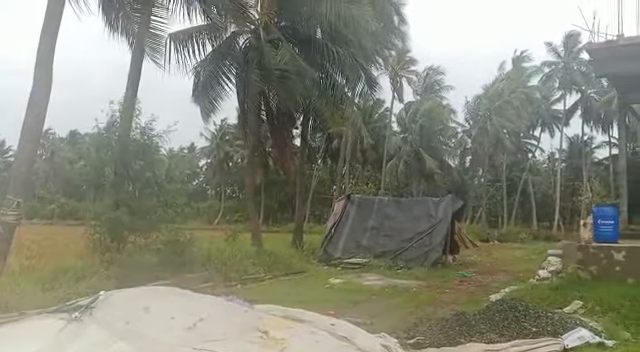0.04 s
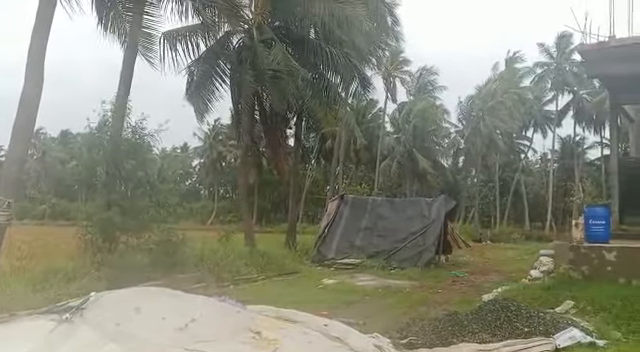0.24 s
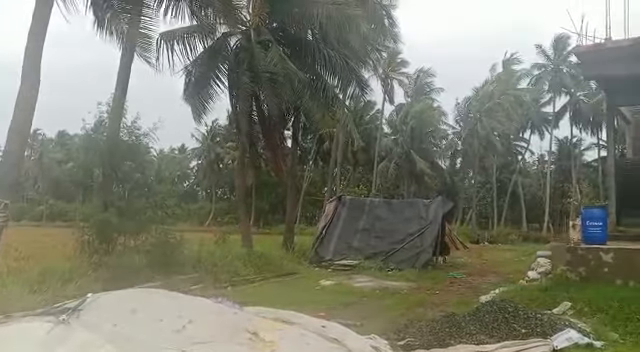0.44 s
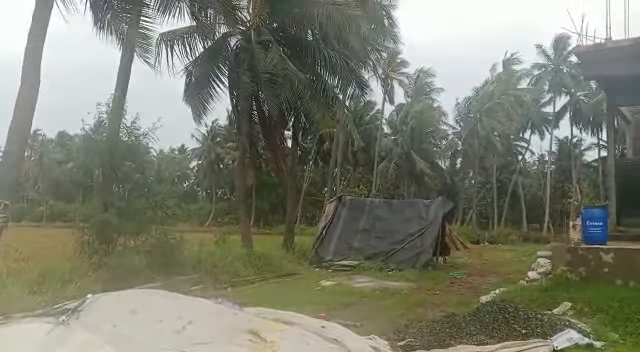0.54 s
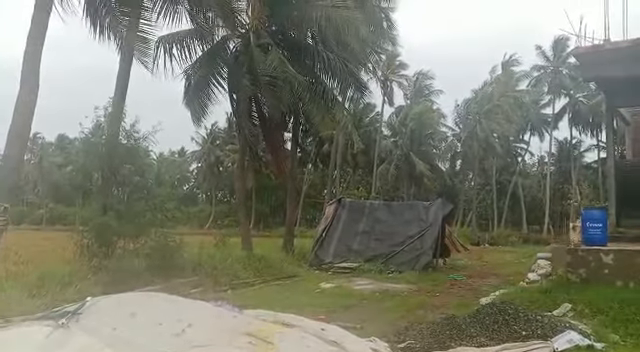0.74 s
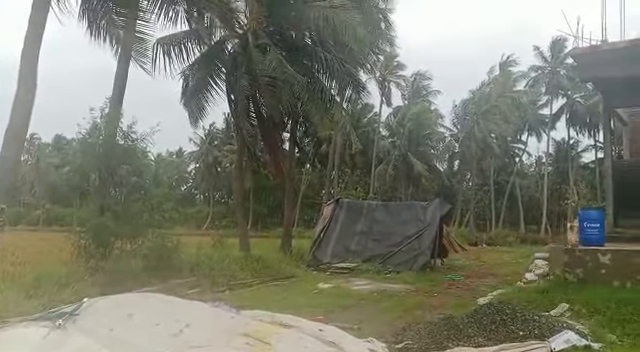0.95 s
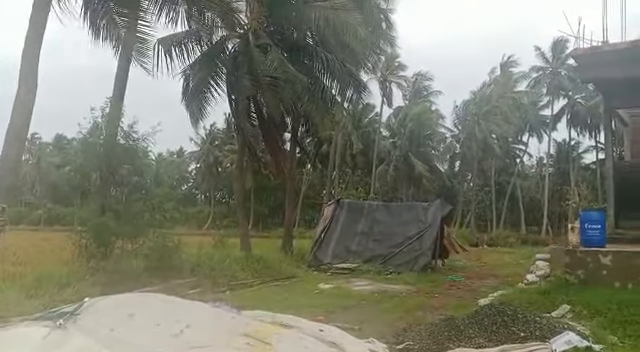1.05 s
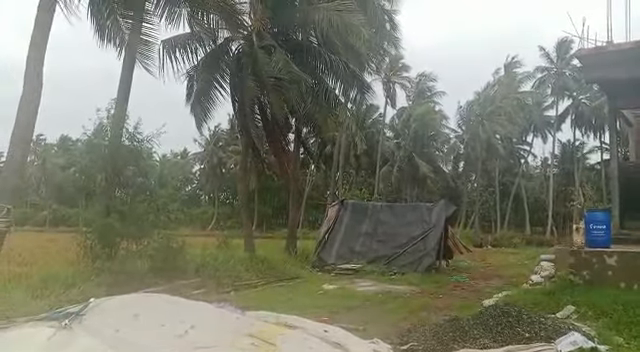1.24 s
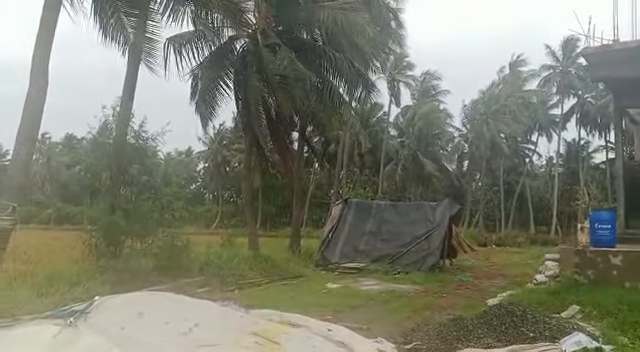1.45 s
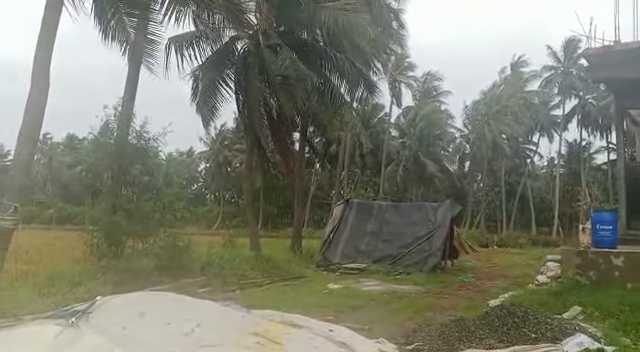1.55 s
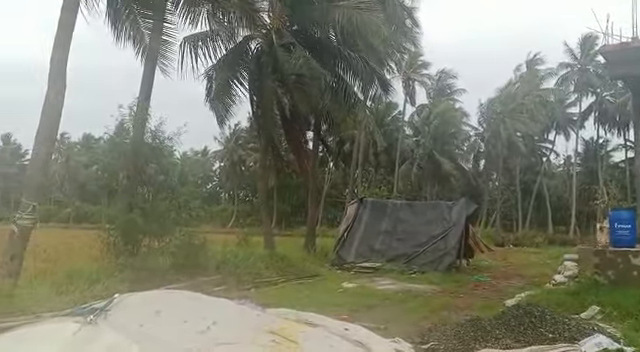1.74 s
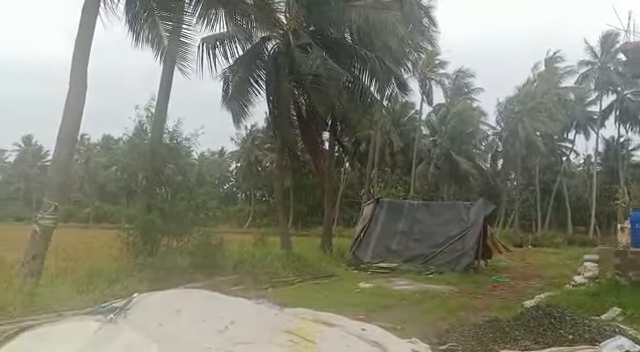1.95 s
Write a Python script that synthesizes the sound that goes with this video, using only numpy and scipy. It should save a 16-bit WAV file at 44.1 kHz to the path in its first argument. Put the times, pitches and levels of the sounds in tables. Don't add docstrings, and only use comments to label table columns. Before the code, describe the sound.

Strong wind hits a bare microphone in an open field: a burst of thumps, lighter broken flutter with brief lulls, then a dense roaring gust. Very faint palm rustle and insect hiss sit far behind.

```python
import sys
import numpy as np
from scipy import signal
from scipy.fft import rfft, irfft, next_fast_len
from scipy.io import wavfile
from scipy.ndimage import uniform_filter1d, minimum_filter1d, map_coordinates

SR = 44100
rng = np.random.default_rng(int(sys.argv[2]) if len(sys.argv) > 2 else 0)


def to_wav(sig):
    pcm = np.clip(np.atleast_2d(sig), -1, 1) * 32767
    pcm = np.round(pcm).astype(np.int16)
    wavfile.write(sys.argv[1], SR, pcm.T)


def gain_from_db(level_db):
    decades = np.asarray(level_db, float) / 20
    return 10 ** decades


N = 88596
TIME_S = np.arange(N) / SR


def unit(x):
    return x / np.sqrt(np.mean(x ** 2) + 1e-20)


def curves(rows):
    s, *cols = np.transpose(rows)
    return [np.interp(TIME_S, s, c) for c in cols]


def wobble(rate_hz):
    knots = rng.standard_normal(int(N * rate_hz / SR) + 4)
    return map_coordinates(knots, [np.arange(N) * rate_hz / SR])


def bump(s, half_s):
    return np.exp(-((TIME_S - s) / half_s) ** 2)


def filtered(x, response):
    m = next_fast_len(N + SR // 2)
    return irfft(rfft(x, m) * response(np.fft.rfftfreq(m, 1 / SR)), m)[..., :N]


def rush(spectrum, patchy_db):
    z = signal.stft(rng.standard_normal(N + 512), nperseg=512)[2]
    patches = uniform_filter1d(rng.standard_normal(z.shape), size=4, axis=0)
    patches = uniform_filter1d(patches, size=8, axis=1)
    x = signal.istft(z * gain_from_db(patchy_db * unit(patches)), nperseg=512)[1][:N]
    f, db = np.transpose(spectrum)

    def colour(hz):
        return gain_from_db(np.interp(np.log(hz + 1), np.log(f + 1), db, left=-120, right=-120))

    return unit(filtered(x, colour))


def narrow(hz, wide_hz):
    return unit(filtered(rng.standard_normal(N), lambda f: np.exp(-((f - hz) / wide_hz) ** 2)))


FINE_DB = 18.5


def eddies(s, top_hz, level_db, tilt_db, scatter_db, span, size=500):
    luck = rng.random(s.shape + (3,))
    octaves = span * luck[..., 0]
    scatter = 3.54 * (luck[..., 1] ** 2.94 - 0.6458)
    fine_loss_db = FINE_DB * np.clip(1 - octaves, 0, 1) ** 2
    gain_db = level_db - fine_loss_db - tilt_db * (octaves - span) + scatter_db * scatter
    hz = (top_hz * 2 ** -octaves).ravel()[:, None]
    gain = gain_from_db(gain_db).ravel()[:, None] * (s.ravel()[:, None] < N / SR)
    phase = luck[..., 2].ravel()[:, None]
    step = np.arange(-size, size)
    periods = step / SR * hz
    width_periods = 0.48
    swing = gain * np.exp(-(periods / width_periods) ** 2) * np.cos(2 * np.pi * (periods + phase))
    centre = np.clip(np.round(s.ravel() * SR).astype(int), 0, N - 1)
    at = centre[:, None] + step + size
    return np.bincount(at.ravel(), swing.ravel(), N + 2 * size)[size:N + size]


# [t/s, level/dB, sharpness/dB]
WIND = [(0, -16, -44.5), (.1, -25, -27.5), (.15, -30.5, -42.5), (.2, -26.5, -22.5), (.31, -36.5, -22.5),
        (.34, -27.5, -26.5), (.44, -31.5, -17.5), (.49, -29.5, -50), (.6, -26, -20.5), (.66, -37, -36.5),
        (.72, -26, -34.5), (.8, -26.5, -25), (.97, -22, -14), (1.36, -23.5, -15.5), (1.41, -26.5, -2.5),
        (1.57, -23, -27), (1.65, -24.5, -9), (2.0, -22.5, -10)]
# [f/Hz, density/dB]
RUMBLE = [(27, -48), (59, 1), (134, 6.5), (500, -15.5), (650, -14.5), (1100, -120)]


def stream(count=2400):
    strength_db, sharp_db = curves(WIND)
    top_hz = np.clip(1650 * gain_from_db(0.22 * sharp_db), 200, 4000)
    lumps = wobble(44.88)
    at = rng.integers(0, N, count)
    lump = lumps[at]
    swirl_hz = top_hz[at] * 2 ** (0.12 * lump)
    swirls = unit(eddies(at / SR, swirl_hz, lump, tilt_db=1.5, scatter_db=4, span=3.193))
    rumble = unit(gain_from_db(3.3 * wobble(25)) * rush(RUMBLE, patchy_db=0.5))
    return gain_from_db(strength_db) * (gain_from_db(0.1) * swirls + gain_from_db(-1.5) * rumble)


# [f/Hz, density/dB]
HISS = [(3000, -120), (4000, -4.5), (11500, 2), (13300, 3), (13700, -5.5), (16000, 5)]


def preamp_hiss():
    return gain_from_db(-78.5 - 4.2 * TIME_S) * rush(HISS, patchy_db=-1.0)


# [t/s, level/dB]
RUSTLE = [(0.03, -71.5), (0.364, -65), (0.446, -67.5), (0.522, -61), (0.578, -68), (0.628, -59),
          (0.72, -69), (1.226, -70), (2.0, -78.5)]
# [f/Hz, density/dB]
FRONDS = [(5000, -32.5), (6830, -6), (7890, -6), (8900, -10), (11600, -30)]
# [f/Hz, density/dB]
LEAVES = [(500, -120), (800, -6), (1250, 1.5), (1650, -20.5), (2100, -13.5), (2700, -27), (3300, -19),
          (4400, -37.5)]


def palm_fronds():
    rustle = gain_from_db(curves(RUSTLE)[0] - 4.5) * rush(FRONDS, patchy_db=4.3)
    wind_db = np.minimum(curves(WIND)[0], -24) + 29
    leaves_db = -58.5 - 1.8 * TIME_S + 0.18 * wind_db
    return rustle + gain_from_db(leaves_db) * rush(LEAVES, patchy_db=4)


# [t/s, level/dB]
CHORUS = [(0.03, -58.5), (0.588, -56.5), (1.296, -56.5), (1.784, -63), (2.0, -63)]
# [f/Hz, density/dB]
INSECTS = [(9000, -31.5), (9610, -1.5), (10000, 6.5), (10500, -1.5), (11900, -24.5), (15400, -60.5)]


def insect_chorus():
    level_db = curves(CHORUS)[0] + 0.43 * wobble(150) + 0.54 * wobble(10)
    return gain_from_db(level_db) * rush(INSECTS, patchy_db=-2.0)


# [t/s, peak level/dB, sharpness/dB, length/s]
FLUTTERS = [(0.02, -2, -16, 0.025), (0.036, -1, -6.5, 0.026), (0.076, -11, -12, 0.016),
            (0.092, -1.5, -23.5, 0.024), (0.114, -18.5, -22, 0.025), (0.189, -33, -34, 0.027),
            (0.197, -9.5, -39, 0.043), (0.256, -10, -39, 0.028), (0.335, -20, -44, 0.028),
            (0.376, -14.5, -28, 0.042), (0.413, -12.5, -23.5, 0.031), (0.434, -36, -2, 0.02),
            (0.529, -14, -28.5, 0.025), (0.551, -18, -38, 0.025), (0.603, -7.5, -24, 0.021),
            (0.704, -9, -31.5, 0.027), (0.726, -5.5, -23, 0.028), (0.754, -9.5, -29, 0.025),
            (0.835, -12, -29, 0.029), (0.875, -10, -29, 0.022), (0.914, -29.5, -27.5, 0.031),
            (0.934, -18, -26, 0.02), (0.957, -9, -39.5, 0.022), (0.974, -4.5, -15.5, 0.027)]
# [t/s, peak level/dB, sharpness/dB, length/s]
PUFFS = [(1.016, -9, -34, 0.028), (1.044, -3, -35, 0.021), (1.069, -12, -41, 0.013),
         (1.099, -1.5, -40.5, 0.018), (1.135, -10, -38.5, 0.021), (1.156, -15, -43, 0.03),
         (1.207, -8, -23.5, 0.026), (1.218, -8, -25.5, 0.018), (1.289, 0.5, -28, 0.023),
         (1.326, -2.5, -32, 0.022), (1.353, -3.5, -28.5, 0.026), (1.441, -6, -29.5, 0.028),
         (1.484, -2.5, -39, 0.036), (1.535, -7.5, -33, 0.026), (1.555, -8, -37, 0.03),
         (1.594, -6.5, -28, 0.018), (1.616, -5, -27, 0.013), (1.629, -8.5, -27, 0.012),
         (1.66, -4.5, -21, 0.018), (1.683, -6, -23.5, 0.022), (1.697, -1.5, -31, 0.027),
         (1.73, -1.5, -26, 0.032), (1.772, -3.5, -24.5, 0.021), (1.809, -4, -28, 0.028),
         (1.825, -5.5, -24, 0.023), (1.89, -7, -32, 0.03), (1.903, -5, -37.5, 0.024),
         (1.959, -12, -31.5, 0.02), (1.979, -8, -20, 0.021)]


def puffs(table, base_hz, law, count=64):
    s, db, sharp_db, length_s = np.transpose(table)[..., None]
    place = 2.7 * (np.arange(count) + rng.random((len(table), count))) / count - 1.25
    edge = np.abs(place) ** 0.85
    late = np.where(place < 0, .42, .62) * place + .3
    top_hz = np.clip(base_hz * gain_from_db(law * sharp_db) * 2 ** (-.3 * edge), 200, 4000)
    level_db = db - 12.5 - 12 * edge
    return eddies(s + length_s * late, top_hz, level_db, tilt_db=3.5, scatter_db=4, span=2.59, size=300)


# [t/s, peak level/dB, f/Hz that the parts are scaled from]
SLAPS = [(0.0368, -10, 1140), (0.0502, -4, 1030), (0.0813, -9.5, 1420), (0.0999, -9.5, 1120),
         (0.4164, -11, 933), (0.4239, -42, 900), (0.4292, -21, 950), (0.4383, -18.5, 1010),
         (0.5334, -20, 1200), (0.6084, -24, 1130), (0.6196, -30, 860), (0.7057, -13.5, 1140),
         (0.7247, -11.5, 860), (0.7293, -28.5, 866), (0.7376, -11.5, 800), (0.7552, -18.5, 830),
         (0.848, -22, 780), (0.879, -15.5, 740), (0.9659, -17.5, 820), (0.9782, -13, 990),
         (0.9827, -10.5, 1400), (1.0181, -9, 772), (1.0303, -10, 1140), (1.0463, -15, 1340),
         (1.0524, -18, 1250), (1.1092, -7, 860), (1.137, -3, 870), (1.1581, -10, 1070),
         (1.2051, -22.5, 1190), (1.2217, -9, 1210), (1.2297, -9, 1530), (1.2984, -8, 1470),
         (1.328, -19, 900), (1.3383, -28, 1150), (1.3494, -8.5, 1350), (1.3569, -10.5, 1123),
         (1.3628, -20.5, 1365), (1.4471, -14.5, 1330), (1.4853, -13.5, 870), (1.492, -21, 800),
         (1.498, -28, 1270), (1.5385, -21, 1120), (1.5443, -4.5, 1033), (1.5617, -10.5, 1273),
         (1.6007, -4, 970), (1.6209, -5.5, 1410), (1.6335, -8, 1420), (1.6649, -13.5, 1404),
         (1.6774, -8, 1253), (1.6957, -11, 1274), (1.7358, -22.5, 1455), (1.7433, -15, 840),
         (1.7738, -12, 1280), (1.8262, -9.5, 1270), (1.832, -15, 930), (1.8934, -17, 890),
         (1.9091, -11.5, 1030), (1.9868, -16, 1600)]
# [share of its f, level/dB]
SLAP_PARTS = [(1.1, -22), (0.67, 4), (.45, -1.5), (0.43, -3.5)]
# [t/s, peak level/dB, f/Hz]
THUMPS = [(0.028, -0.5, 280), (0.067, -21.5, 180), (0.087, -9, 180), (0.108, -11.5, 150), (0.2, -8.5, 250),
          (0.336, -6, 270), (0.377, -13, 240), (0.409, -9, 150), (0.441, -14.5, 220), (0.601, -18, 220),
          (0.707, -7, 220), (0.727, -17.5, 210), (0.766, -9, 260), (0.835, -8.5, 210), (0.88, -23, 240),
          (0.961, -4, 210), (0.976, -9, 300), (0.996, -5, 230), (1.013, -11, 170), (1.047, -14, 270),
          (1.074, -13, 190), (1.112, -2.5, 220), (1.194, -16.5, 210), (1.214, -6.5, 230),
          (1.294, -15.5, 230), (1.356, -6.5, 280), (1.492, -14, 260), (1.548, -14, 220), (1.582, -6, 170),
          (1.692, -5.5, 260), (1.744, -8.5, 200), (1.839, -10.5, 270), (1.964, -13.5, 210)]


def strikes():
    s, db, hz = np.transpose(SLAPS)[..., None]
    share, part_db = np.transpose(SLAP_PARTS)
    part_s = s + 0.00201 * rng.uniform(-1.1, 1, (len(SLAPS), len(share)))
    slaps = eddies(part_s, hz * share, db + part_db - 2.5 + FINE_DB, 0, 0.77, 0, size=300)
    s, db, hz = np.transpose(THUMPS)
    return slaps + eddies(s, hz, db - 1.5 + FINE_DB, 0, 0.77, 0)


# [f/Hz, level/dB]
WHISTLES = [(1125, -59), (1510, -66)]


def whistles():
    start_s, end_s = .13, .52
    fade_in = np.clip((TIME_S - start_s) / 0.035, 0, 1)
    fade_out = np.clip((end_s - TIME_S) / 0.045, 0, 1)
    return fade_in * fade_out * sum(gain_from_db(db) * narrow(hz, wide_hz=25) for hz, db in WHISTLES)


# [t/s, f/Hz, level/dB, half length/s]
PEEPS = [
    (0.255, 3150, -66, 0.018),
    (0.301, 3290, -62, 0.02),
    (0.45, 3240, -70, 0.04),
    (1.982, 7750, -71, 0.0034),
]


def bird():
    return sum(gain_from_db(db) * bump(s, half_s) * narrow(hz, wide_hz=130) for s, hz, db, half_s in PEEPS)


# [t/s, half length/s]
LULLS = [
    (.31, .016),
    (.49, .028),
    (.665, .026),
    (1.415, .011),
    (1.522, .006),
    (1.938, .009),
]


def lulls(air):
    fine = filtered(air, lambda hz: 1 / (1 + (480 / (hz + 1)) ** 6))
    depth = sum(np.exp(-((TIME_S - s) / half_s) ** 4) for s, half_s in LULLS)
    return air + fine * (gain_from_db(-13 * depth) - 1)


# [t/s, peak level/dB]
TICKS = [
    (0.4378, -63),
    (0.6204, -63),
    (1.3396, -53),
    (1.5985, -60),
]


def grit():
    x = np.zeros(N)
    for s, db in TICKS:
        x[round(s * SR)] = gain_from_db(db + 16.5)
    return filtered(x, lambda hz: 1j * hz / (2500 + 1j * hz))


# [t/s, level/dB, half length/s]
WHISPS = [
    (.49, -75.5, .045),
    (.7, -76, .015),
    (1.5, -78, .022),
]
# [f/Hz, density/dB]
TIPS = [(10800, -60), (11700, -1), (13200, -3), (14000, -40)]


def leaf_tips():
    swell = sum(gain_from_db(db) * bump(s, half_s) for s, db, half_s in WHISPS)
    return swell * rush(TIPS, patchy_db=3)


def port(air):
    low_hz, high_hz = 66, 3700
    return filtered(air, lambda hz: (1j * hz / (low_hz + 1j * hz)) ** 2 / (1 + (hz / high_hz) ** 6))


def scene():
    air = stream() + strikes()
    air = air + puffs(FLUTTERS, base_hz=2265, law=0.23) + puffs(PUFFS, base_hz=4226, law=0.26)
    far = palm_fronds() + insect_chorus() + whistles() + bird() + leaf_tips()
    return (port(lulls(air)) + far + grit() + preamp_hiss())[None]


def low_pass(x):
    return signal.sosfilt(signal.butter(12, 15800, fs=SR, output="sos"), x)


def record(dry):
    ceiling, top_hz = .62, 15800
    need = np.minimum(1, ceiling / (np.abs(dry) + 1e-9))
    gain = minimum_filter1d(need, size=801)
    gain = uniform_filter1d(uniform_filter1d(gain, size=400), size=400)
    mix = filtered(dry * gain, lambda hz: hz < top_hz)
    return low_pass(mix)


dry = scene()
out = record(dry)
to_wav(out)
```